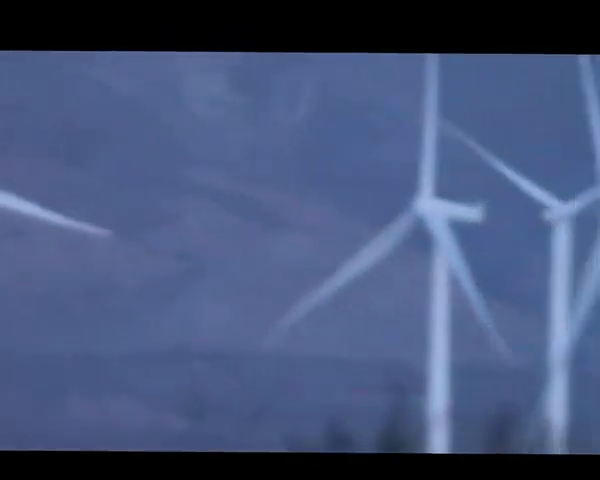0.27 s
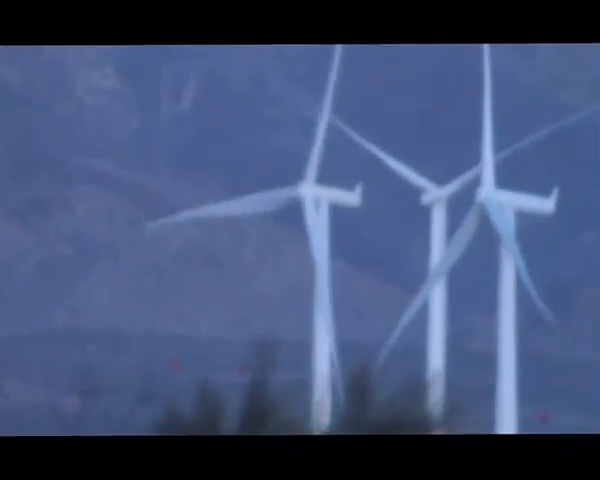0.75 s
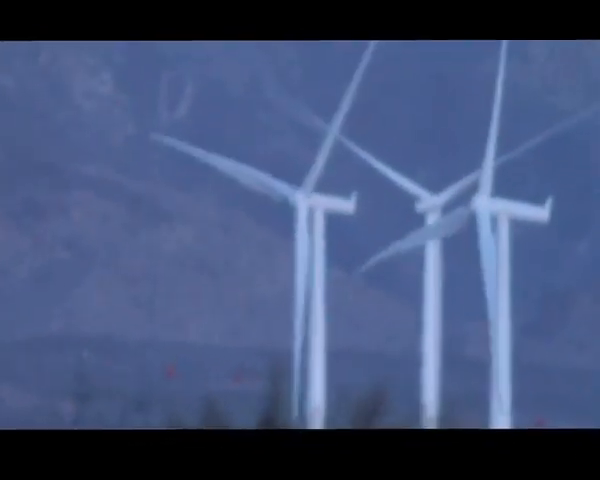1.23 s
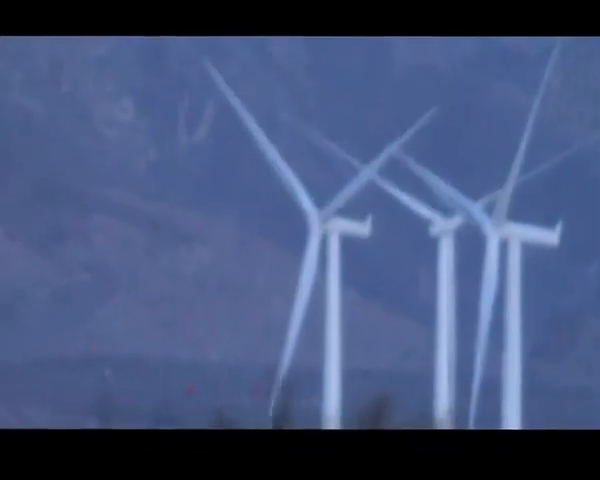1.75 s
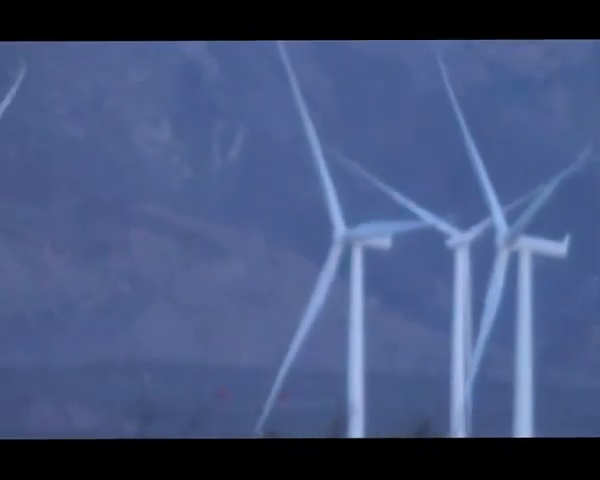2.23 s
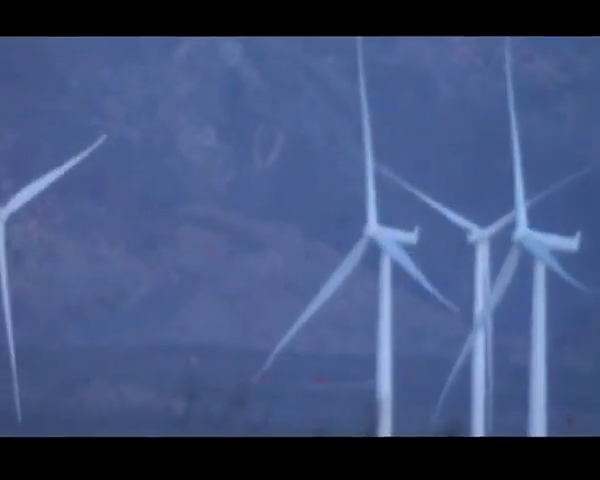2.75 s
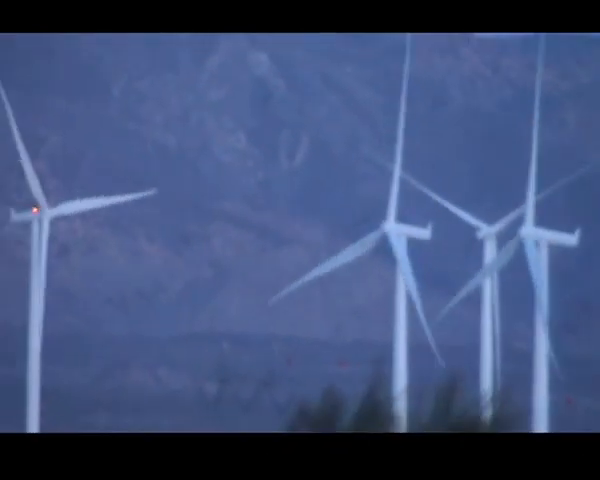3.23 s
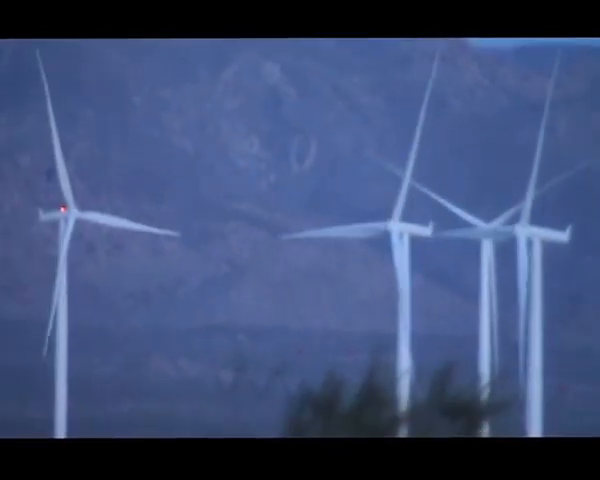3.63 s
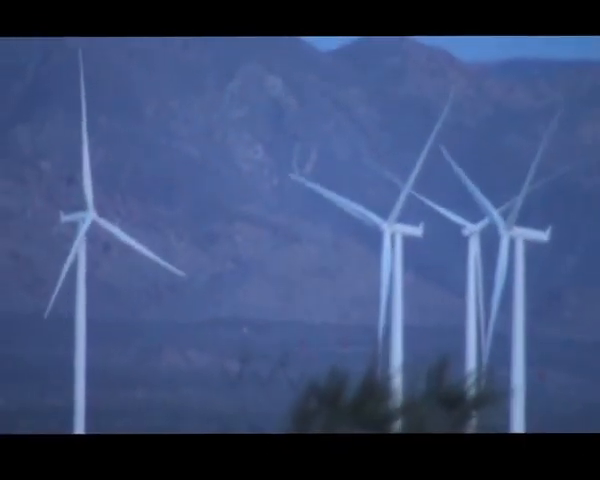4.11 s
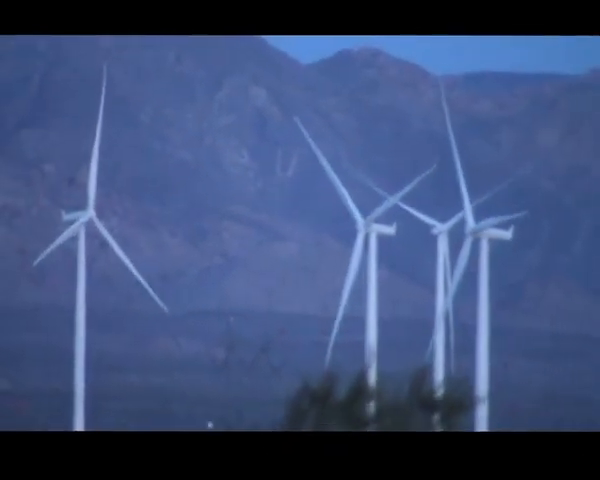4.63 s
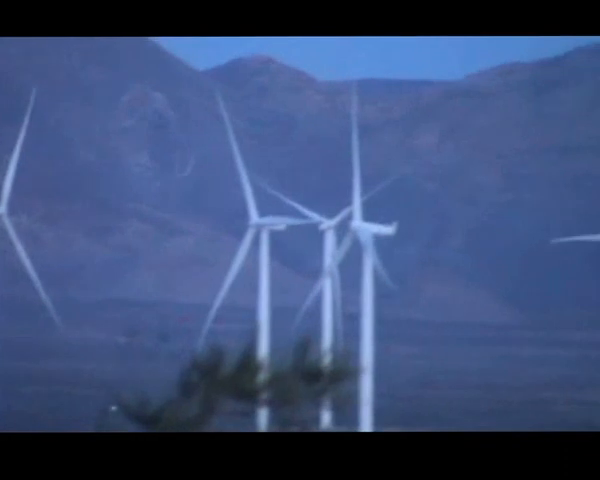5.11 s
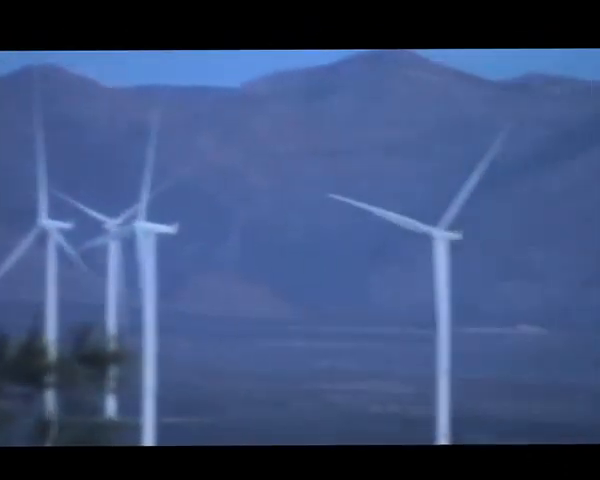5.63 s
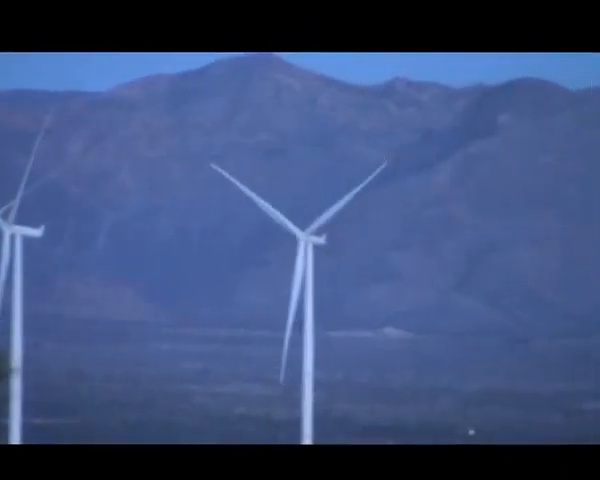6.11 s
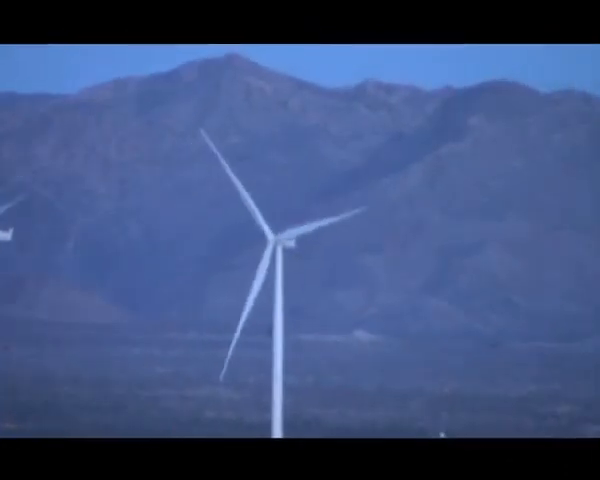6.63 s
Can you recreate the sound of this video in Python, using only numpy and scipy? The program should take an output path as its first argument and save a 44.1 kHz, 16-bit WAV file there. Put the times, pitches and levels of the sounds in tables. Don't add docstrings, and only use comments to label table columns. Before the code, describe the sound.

Heavy wind batters a small stereo microphone, rumbling, thumping and fluttering in uneven surges, with a faint motor whine and sharper handling clicks near the end.

```python
import sys
import numpy as np
from scipy import signal
from scipy.fft import rfft, irfft
from scipy.io import wavfile

SR = 44100
rng = np.random.default_rng(int(sys.argv[2]) if len(sys.argv) > 2 else 0)


def file_out(sig):
    cols = np.atleast_2d(sig).T
    lim = np.clip(cols, -1, 1)
    pcm = np.round(lim * 32767).astype(np.int16)
    wavfile.write(sys.argv[1], SR, pcm)


def decibels_to_gain(level_db):
    exponent = np.asarray(level_db, float) / 20
    return 10 ** exponent


N = 302526

LAYER_HZ = [50, 165, 520, 1500]


def evened(x):
    return x / np.sqrt(np.mean(abs(x) ** 2) + 1e-20)


def read(f, value, hz):
    return np.interp(np.log(hz + 1), np.log(np.asarray(f) + 1.), value)


def drift(top_hz, channels=1):
    hz = np.fft.rfftfreq(N, 1 / SR)
    shape = (hz > 4) / np.sqrt(hz + 22.0) * np.exp(-(hz / top_hz) ** 2)
    return evened(irfft(rfft(rng.standard_normal((channels, N))) * shape, N))


def resonate(x, hz, width):
    turn = np.exp(2j * np.pi * np.cumsum(hz * np.ones(x.shape[-1])) / SR)
    r = np.exp(-np.pi * width / SR)
    smoothed = signal.lfilter([(1 - r) ** 2], [1, -2 * r, r * r], x / turn)
    return 2 * (turn * smoothed).real


def bumps(s, db, width):
    out = np.zeros(N)
    bell = np.exp(-(np.arange(-2000, 2001) / SR / width) ** 2)
    np.add.at(out, np.round(np.asarray(s) * SR).astype(int), decibels_to_gain(np.asarray(db)))
    return signal.oaconvolve(out, bell, "same")


def above(x, edge_hz):
    hz = np.fft.rfftfreq(N, 1 / SR)
    return irfft(rfft(x) * hz ** 2 / (hz ** 2 + edge_hz ** 2), N)


def hiss():
    # f/Hz, density level/dB per Hz
    noise_curve = [(880, -30), (1500, -4), (1990, 0), (2310, 0), (2650, -1), (3460, -2), (4050, -4),
                   (15700, -14.5)]
    # f/Hz, level/dB
    whistle_lines = [(15734, -83), (3375, -78), (5238, -85)]
    hiss_db = -58.5
    common, *own = rng.standard_normal((3, N))
    noise = 0.6 * common + 0.7 * np.array(own)
    colour = decibels_to_gain(read(*np.transpose(noise_curve), np.fft.rfftfreq(N, 1 / SR)))
    t = np.arange(N) / SR
    whistles = sum(decibels_to_gain(db) * np.sqrt(2) * np.sin(2 * np.pi * hz * t) for hz, db in whistle_lines)
    return decibels_to_gain(hiss_db) * evened(irfft(rfft(noise) * colour, N)) + whistles


def motor():
    # start t/s, stop t/s
    run_times = [
        (0, .502),
        (1.686, 5.609),
    ]
    # whine level/dB, gear rustle level/dB at the start and at the stop
    run_levels = [(-66.5, -76, -72.5), (-66.5, -80, -85)]
    # f/Hz, width/Hz, level/dB
    barrel = [(3940, 1200, 0.5), (4930, 400, 0), (7650, 140, -1), (8200, 90, -9), (9960, 1200, 1.5),
              (11540, 600, -0.5)]
    # t/s, f/Hz, level/dB
    squeaks = [(.018, 7680, -68), (.146, 7680, -63), (.231, 7700, -59), (.305, 7640, -73),
               (.344, 7680, -74), (1.74, 8390, -61), (1.83, 7680, -64), (2.079, 7900, -61),
               (2.28, 8140, -83), (2.31, 8140, -67), (2.345, 8140, -70), (2.45, 8390, -65),
               (2.53, 8140, -64), (2.56, 7720, -63), (2.479, 7910, -62), (2.582, 7860, -60),
               (2.65, 7910, -61), (2.82, 8300, -61), (2.915, 7910, -65), (2.945, 7910, -71),
               (2.98, 7910, -68), (3.25, 8140, -63), (3.315, 8240, -71), (2.42, 7700, -68),
               (2.5, 7720, -72), (2.62, 7680, -67), (2.83, 7700, -67), (3.83, 8140, -61),
               (3.901, 7910, -62), (4.1, 8140, -69)]
    # first t/s, last t/s
    chirp_span = (1.4, 3.8)
    # lowest f/Hz, highest f/Hz
    chirp_range = (7520, 8000)
    chirps_per_s, chirp_db = 18, -74
    whine_hz = 6636
    ease_s, ease_db = 0.055, -5

    t, out = np.arange(N) / SR, np.zeros(N)
    noise = rng.standard_normal((2, N))
    waver, throb, chatter = drift(55, channels=3)
    phase = 2 * np.pi * np.cumsum(whine_hz + 12 * waver) / SR
    tone = np.sqrt(2) * np.sin(phase) * decibels_to_gain(1.1 * throb)
    whine = evened(tone + .5 * evened(resonate(noise[0], whine_hz, 90)))
    rustle = sum(decibels_to_gain(db) * evened(resonate(noise[1], hz, width)) for hz, width, db in barrel)
    rustle = evened(rustle * decibels_to_gain(2.0 * chatter))
    for (whine_db, *ends_db), (start, stop) in zip(run_levels, run_times):
        rustle_db = np.interp(t, [start, stop], ends_db) + 12.0 + ease_db * (t > stop - ease_s)
        running = (t > start) & (t < stop)
        out += running * (decibels_to_gain(whine_db) * whine + decibels_to_gain(rustle_db) * rustle)

    u = np.arange(-1000, 1001) / SR
    (start, stop), (low, high) = chirp_span, chirp_range
    chance = rng.random((200, 3))[:round(chirps_per_s * (stop - start))]
    chirps = [(start + a * (stop - start), low + b * (high - low), chirp_db + 6 * c) for a, b, c in chance]
    for s, hz, db in squeaks + chirps:
        at = max(round(s * SR) - 1000, 0)
        out[at:at + len(u)] += decibels_to_gain(db) * np.exp(-(u / 0.01) ** 2) * np.sin(2 * np.pi * hz * u)
    return np.array([out * decibels_to_gain(4.5), np.roll(out, 1) * decibels_to_gain(-0.5)])


def clicks():
    # t/s, tick level/dB, knock and sizzle level/dB against the tick, rise/s
    click_events = [(0.4050, -40, -13, -9, 0.0032), (0.407, -36.5, -19, -17, 0.0011),
                    (0.408, -48.5, 9, -1, 0.0082), (0.5024, -45, -13, 1, 0.0012),
                    (1.1527, -48.5, -11, -4, 0.0014), (1.6866, -45, -4, -7, 0.0011),
                    (5.5405, -49, 10, -3, 0.0019), (5.5488, -42, 3, -10, 0.0024),
                    (5.5555, -39, 3, -14, 0.0026), (5.5604, -32, 12, -8, 0.001),
                    (5.5626, -36.5, 4.5, -25, 0.0026), (5.6075, -46, -4, -9, 0.0017),
                    (6.77, -64, -8, 7, 0.046), (6.799, -53, -5, 5, 0.0016), (6.8058, -40, -14, 3, 0.00098),
                    (6.818, -43.5, 5, -1, 0.011), (6.827, -32, -25, 11, 0.00087),
                    (6.838, -50, -3, 5, 0.001), (6.845, -23.5, 2.5, -5, 0.0012),
                    (6.8593, -37, 1, -11, .0008)]
    # f/Hz, width/Hz
    body_modes = [(1350, 1100), (3700, 1900), (6300, 1800), (9300, 2500), (13000, 4700)]
    pan_db = -3
    side_db = pan_db / 2 * np.array([[1], [-1]])
    stretches = [1.1, 0.66, 0.65, 0.49, 1.2]
    t, out = np.arange(3000) / SR, np.zeros((2, N + 3000))
    noises = rng.standard_normal((len(click_events), 3, 3000))
    for (s, db, knock_db, sizzle_db, rise), noise in zip(click_events, noises):
        crackle = noise[0] + 0.58 * noise[1:]
        shares_db = [knock_db, .5, -7 - 0.43 * knock_db, sizzle_db, sizzle_db - 20]
        modes = zip(shares_db, stretches, body_modes)
        for own, (share_db, slower, (hz, width)) in enumerate(modes):
            u = t / (max(rise, .0003) * slower)
            blow = np.roll(crackle, 500 * own, 1) * u * np.exp(1 - u)
            sound = resonate(blow, hz, width) * np.sqrt(SR / width)
            out[:, round(s * SR):][:, :3000] += sound * decibels_to_gain(db + share_db - 9 + side_db)
    return out[:, :N]


def snaps():
    # t/s, peak level/dB, f/Hz
    vortices = [(0.918, -27, 510), (0.971, -33, 643), (1.622, -25, 530), (1.829, -23, 525),
                (2.207, -34, 646), (2.28, -25, 552), (2.379, -22, 510), (3.088, -26, 567),
                (3.178, -32, 660), (3.202, -40, 587), (3.283, -33, 568), (3.358, -27, 501),
                (4.391, -27, 536), (4.472, -30, 670), (4.561, -19, 540), (4.635, -34, 514),
                (5.012, -29, 640), (5.256, -29, 690), (6.113, -23, 505), (6.205, -21, 510),
                (6.34, -31, 530), (6.778, -23.5, 522)]
    rise_s, side_db, snap_db = 0.0019, 9, -10
    t, out = np.arange(800) / SR, np.zeros((2, N + 800))
    u = t / rise_s
    for (s, db, hz), (turn, sign) in zip(vortices, rng.random((len(vortices), 2))):
        angle = 2 * np.pi * (hz * (1.26 * t - 25 * t ** 2) + turn)
        side = decibels_to_gain(side_db) * np.sign(sign - .5) * np.cos(angle)
        pressure = np.sin(angle) + np.outer([1, -1], side)
        out[:, round(s * SR):][:, :800] += decibels_to_gain(db + snap_db) * u * np.exp(1 - u) * pressure
    return out[:, :N]


def gusts(t):
    # t/s, level/dB
    speed = [(0.0, -1.5), (0.54, -2), (1.01, 1.5), (1.18, -2.5), (1.45, -5), (1.64, 4.5), (2.51, 4),
             (2.82, -6), (3.38, 7), (3.7, 2.5), (4.26, -0.3), (4.45, 2.5), (4.72, -3), (5.35, -6.5),
             (6.13, 1), (6.36, 1.5), (6.68, -1.2), (6.86, 4.5)]
    follow = [.58, .93, 1.14, 1.15]
    # t/s, rumble level/dB, half length/s
    heaves = [(0.1, 2.5, 0.18), (0.256, -11, 0.047), (0.418, -11, 0.04), (0.528, -4, 0.054),
              (0.81, -13, 0.025), (1.1, -3.5, 0.053), (1.242, 9.5, 0.044), (1.885, 9.5, 0.019),
              (1.983, 9, 0.065), (2.3, 0.5, 0.03), (2.48, -2, 0.079), (2.658, 4, 0.076), (2.933, 10, 0.021),
              (3.042, -7, 0.042), (3.25, -32, 0.032), (4.092, 3, 0.094), (4.345, 9.5, 0.02),
              (4.5, -9.5, 0.09), (4.833, 10.5, 0.04), (4.938, -3, 0.057), (5.006, 8.5, 0.096),
              (5.143, -3, 0.081), (5.255, 8, 0.032), (5.425, 0, 0.069), (5.6, 10, 0.038), (5.97, -7, 0.012),
              (6.334, 3, 0.016), (6.405, -10, 0.034), (6.6, -1.5, 0.049), (6.77, 4, 0.066)]
    # t/s, level/dB, half length/s, eddy f/Hz
    flurries = [(0.233, -5, 0.14, 286), (0.525, -9.5, 0.11, 165), (0.707, 4.5, 0.034, 885),
                (0.825, -7.5, 0.097, 880), (0.927, 11, 0.02, 276), (1.084, 8.5, 0.014, 880),
                (1.33, 7, 0.026, 1500), (2.12, -4.5, 0.061, 503), (2.345, 1, 0.15, 1500),
                (2.662, 5, 0.046, 290), (2.778, -2.5, 0.045, 517), (3.113, 4, 0.12, 875),
                (3.233, -2.5, 0.086, 292), (3.452, -3, 0.0078, 165), (3.655, -6, 0.039, 517),
                (3.733, 1.5, 0.021, 165), (3.97, -6.5, 0.086, 165), (4.084, 2.5, 0.12, 290),
                (4.26, -6, 0.044, 1500), (4.399, 14, 0.0043, 865), (4.478, -3, 0.033, 165),
                (4.584, 8, 0.05, 890), (4.596, -13, 0.03, 1500), (4.948, -4, 0.039, 1500),
                (5.042, 6, 0.022, 520), (5.248, 8, 0.017, 290), (5.41, -9.5, 0.024, 493),
                (6.065, -8, 0.037, 520), (6.342, 7, 0.032, 880), (6.673, -3, 0.039, 290)]
    # t/s, level/dB, half length/s
    flares = [(0.885, 6, 0.014), (0.98, -4, 0.014), (1.614, 3.5, 0.098), (1.818, 2.5, 0.053),
              (2.004, 2.5, 0.089), (2.304, -1, 0.0094), (2.416, 7, 0.03), (3.17, -2, 0.02),
              (3.394, 6, 0.032), (3.49, 2.5, 0.02), (3.55, 2, 0.043), (4.496, 6.5, 0.017),
              (5.97, 3.5, 0.029), (6.353, -1.5, 0.022), (6.442, 4.5, 0.034)]
    # t/s, level/dB
    thuds = [(.13, 4), (.17, -7), (.46, 2.5), (.53, 5.5), (1.02, 0), (1.66, -6), (1.85, 5.5), (1.89, -6),
             (2.39, -10), (2.58, 0), (2.85, 4.5), (3.2, 6), (3.61, 6.5), (3.69, -8), (3.94, 4.5),
             (4.67, 10), (4.82, -6), (4.89, -4), (5.16, -1), (5.21, 5.5), (5.26, -2), (5.32, -1), (5.37, 7),
             (5.45, 3), (5.64, 6), (5.76, 8), (5.8, -11), (5.89, -10), (5.94, 9), (6.16, -8.5), (6.29, 8),
             (6.4, 13), (6.57, 9.5), (6.73, 5)]
    # t/s, level/dB
    buffets = [(.01, -6), (.42, 6), (.75, 0), (1.26, -5.5), (1.33, 3.5), (1.51, 1), (1.6, -2), (1.81, -6),
               (1.98, -5), (2.17, 3.5), (2.43, 6.5), (2.48, -7.5), (2.56, -4.5), (2.75, -6.5), (3.87, -4.5),
               (4.03, 5), (4.28, -9), (4.55, 1.5), (4.62, -6), (5.18, -10), (5.26, 0.5), (5.33, -11),
               (6.02, 2.5), (6.39, -7)]
    # t/s, level/dB
    roars = [(.31, -2), (.81, 6.5), (1.04, 3.5), (1.17, -8), (1.22, 8), (1.45, -3), (1.93, 1.5), (2.03, 1),
             (2.71, 4), (2.79, -3.5), (3.09, -7), (3.42, -5), (3.56, -6), (3.78, 2), (3.85, -3), (4.87, 2),
             (5.51, 4), (5.98, -3), (6.21, 6), (6.51, 7), (6.66, -7)]
    surge_halves = [0.022, 0.021, 0.017]
    flurry_spread = 1.72

    layers = np.outer(follow, np.interp(t, *np.transpose(speed)))
    s, db, half = np.transpose(heaves)
    layers[0] += db @ np.exp(-((t - s[:, None]) / half[:, None]) ** 2)
    s, db, half, pitch = np.transpose(flurries)
    distance = np.arange(1, 4)[:, None] - read(LAYER_HZ, np.arange(4), pitch)
    reach = np.exp(-(distance / flurry_spread) ** 2)
    layers[1:] += reach * db @ np.exp(-((t - s[:, None]) / half[:, None]) ** 2)
    s, db, half = np.transpose(flares)
    layers[3] += db @ np.exp(-((t - s[:, None]) / half[:, None]) ** 2)
    for layer, (surges, half) in enumerate(zip([thuds, buffets, roars], surge_halves)):
        s, db = np.transpose(surges)
        layers[layer] += db @ np.exp(-((t - s[:, None]) / half) ** 2)
    return layers


def eddies():
    # t/s, level/dB over the turbulence, left minus right level/dB
    slaps = [(0.066, 14, 11), (0.628, 7, 24), (0.742, 10, 9), (0.921, 3, 3), (0.982, 14, 23),
             (1.335, 13, 1), (1.544, 1.5, 33), (1.723, 5, -16), (1.971, -29, 12), (2.008, 4.5, 31),
             (2.147, 15, 7), (2.367, 18, 9), (2.531, 33, -8), (2.94, 27, 10), (3.183, 4, -8),
             (3.447, -7, 18), (3.575, 13.5, 14), (3.763, 18, 0.5), (4.023, 15, 17), (4.061, 13, 13.5),
             (4.11, 16, -7), (4.333, 14, -20.5), (4.565, 24, 3), (5.024, 27, 7), (5.231, 13, -1),
             (5.259, 0, -17), (5.572, 14, -9), (6.121, 5, -11), (6.303, 21, 17.5), (6.352, 1, 22)]
    # t/s, level/dB over the turbulence
    puff_events = [(0.753, 20), (0.923, 14.5), (0.974, 18.5), (1.09, -8), (1.306, 17), (1.32, 5),
                   (1.828, 12.5), (1.963, 13.5), (2.029, 10), (2.206, 10), (2.347, 20), (2.38, 5),
                   (2.409, 3), (2.529, 1), (2.625, 9), (2.687, 18), (3.145, 11.5), (3.179, 16.5),
                   (3.396, -2), (4.023, -13), (4.428, 15), (4.564, 14), (4.88, 10), (5.026, 15), (5.26, 14),
                   (5.724, 15), (5.939, 15.5), (6.113, 16.5), (6.301, 9), (6.343, 11.5), (1.591, 5.5),
                   (1.669, 4.5), (2.114, 11), (2.271, 6), (2.296, 12), (2.332, 12), (3.261, 6), (3.322, 8),
                   (3.386, 8), (3.431, 8), (3.482, 12), (3.514, 3.5), (3.36, 11), (3.53, 12), (6.45, 7)]
    crackles_per_s, crackle_db, crackle_s = 33, 2, 0.0037

    smooth, fine = rng.standard_normal((2, 2, N))
    bursts = decibels_to_gain(1.4 * drift(41) + 1.22 * drift(170, channels=2))
    size = decibels_to_gain(4.1 * np.minimum(rng.exponential(1, (2, N)), 4)) * rng.choice([-1., 1.], (2, N))
    lumps = evened(size * (rng.random((2, N)) < 300 / SR) * bursts)
    kicks = 1.08 * evened(smooth * bursts) + 0.55 * lumps

    slap = decibels_to_gain(14) * signal.windows.hann(16) / 8
    for (s, db, pan_db), sign in zip(slaps, rng.choice([-1., 1.], len(slaps))):
        port_db = min(db, 14) + 1.19 * pan_db * np.array([[.5], [-.5]])
        push = sign * decibels_to_gain(port_db) * [[1], [-1]]
        kicks[:, round(s * SR):][:, :len(slap)] += push * slap

    s, db = np.transpose(puff_events)
    when, strength = rng.random((600, 2))[:round(crackles_per_s * N / SR)].T
    crackles = bumps(when * (N - 1) / SR, crackle_db + 6 * strength, crackle_s)
    puffs = above(above(fine * (bumps(s, db - 0.5, 0.0043) + crackles), 640), 640)
    return smooth + above(above(kicks - smooth, 70), 70) + puffs


def wind():
    # f/Hz, density level/dB per Hz
    wind_curve = [(12, -26), (20, -9), (54, 4.5), (103, 0.5), (161, -2), (373, -15), (466, -20.5),
                  (1480, -39.5), (4000, -69), (5200, -80), (8800, -120)]
    # f/Hz, left-right likeness 0-1, phase lead of left/rad, extra left minus right level/dB
    matrix = [(30, 0.87, -0.2, -4), (82, 0.98, 0.02, 5.5), (165, 0.16, -1.82, -2), (345, 0.8, -2.5, -3),
              (695, 0.74, -2.5, -2.5), (1410, 0.82, -2, -2.5), (3000, 0.94, -2, -3)]
    # t/s, left minus right level/dB
    lean = [(0, 2.4), (1.5, 2), (2.2, 2.4), (3, 3), (4, 2.7), (5, 1.9), (5.7, 3.5), (6.4, 3.5),
            (6.86, 0.67)]
    sway_db, wind_db = 1.5, -19.5

    hz, t, (a, b) = signal.stft(eddies(), SR, nperseg=2048, noverlap=1792)
    layers = gusts(t)
    pan = np.interp(t, *np.transpose(lean)) + sway_db * np.interp(t, np.arange(N) / SR, drift(25)[0])
    layers = layers - 10 * np.log10(np.mean(decibels_to_gain(layers) ** 2, 1))[:, None]
    place = read(LAYER_HZ, np.arange(4), hz)
    swell_db = np.clip(1 - abs(place[:, None] - np.arange(4)), 0, 1) @ layers
    swell_db += read([1500, 3500], [0, .5], hz)[:, None] * layers[3]
    colour_db = read(*np.transpose(wind_curve), hz)[:, None]

    f, *columns = np.transpose(matrix)
    same, phase, tilt_db = (read(f, c, hz)[:, None] for c in columns)
    same = np.clip(same, 0, 1)
    pan = pan * np.clip(place, 0, 1)[:, None]
    side_db = (tilt_db + pan) / 2
    leak, turn = np.arcsin(same) / 2, np.exp(1j * phase)
    left = (np.cos(leak) * a + np.sin(leak) * turn * b) * decibels_to_gain(side_db)
    right = (np.cos(leak) * b + np.sin(leak) / turn * a) * decibels_to_gain(-side_db)
    centre = np.sqrt((1 + same * np.cos(phase)) / 2)
    z = np.array([left, right]) * decibels_to_gain(colour_db + swell_db) / centre
    sound = signal.istft(z, SR, nperseg=2048, noverlap=1792)[1][:, :N]
    return decibels_to_gain(wind_db) * evened(sound)


def scene():
    return wind() + hiss() + motor() + clicks() + snaps()


def low_pass(x):
    return signal.sosfilt(signal.butter(12, 16050, fs=SR, output="sos"), x)


def record(dry):
    limited = dry / (1 + abs(dry / .95) ** 4) ** .25
    limited = limited * np.minimum(np.arange(N) / SR / .004, 1)
    edge = signal.firwin(511, 15830, window=("kaiser", 9), fs=SR)
    banded = signal.oaconvolve(limited, edge[None], "same")
    return low_pass(banded)


dry = scene()
out = record(dry)
file_out(out)
```